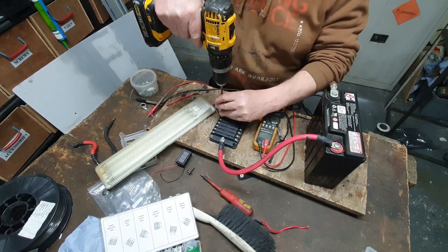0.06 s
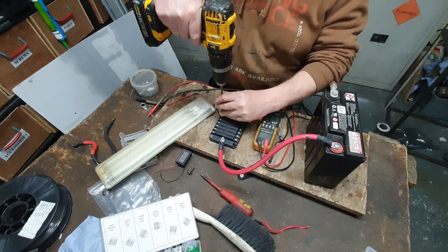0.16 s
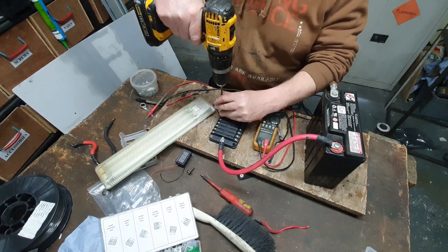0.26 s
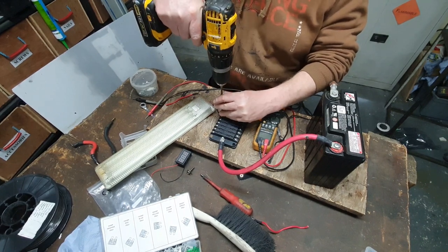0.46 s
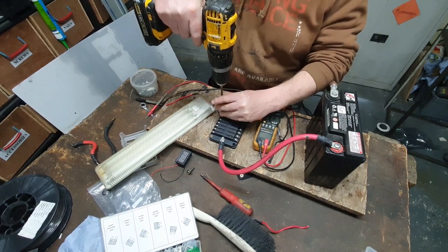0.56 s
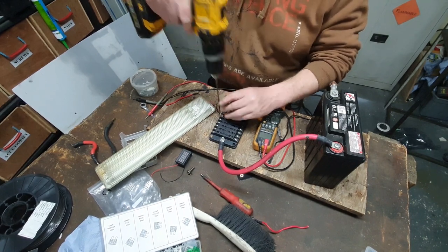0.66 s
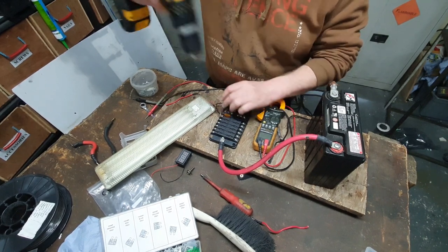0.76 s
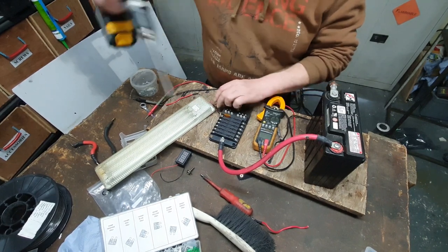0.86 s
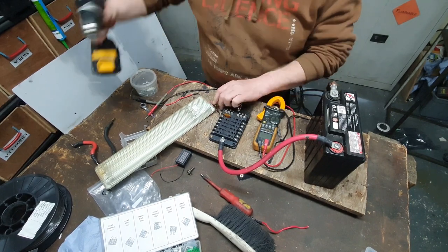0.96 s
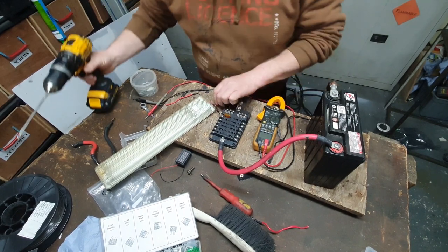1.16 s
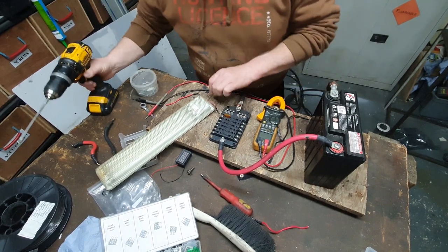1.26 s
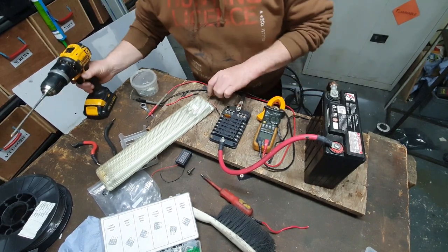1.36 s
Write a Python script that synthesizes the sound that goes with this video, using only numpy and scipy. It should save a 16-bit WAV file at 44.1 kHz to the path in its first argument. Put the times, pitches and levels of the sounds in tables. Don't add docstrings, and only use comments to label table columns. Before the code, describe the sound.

After light contact knocks, a cordless drill whirs up briefly, its bit snaps and slips in the screw, and it stops abruptly; a later clack and quiet metallic rattles follow in a small, lively workshop, heard close.

```python
import sys
import numpy as np
from scipy import signal
from scipy.fft import rfft, irfft, next_fast_len
from scipy.io import wavfile
from scipy.ndimage import uniform_filter1d, map_coordinates

SR = 44100
rng = np.random.default_rng(int(sys.argv[2]) if len(sys.argv) > 2 else 0)


def inscribe(sig):
    pcm = np.round(np.clip(np.atleast_2d(sig).T, -1, 1) * 32767)
    wavfile.write(sys.argv[1], SR, pcm.astype(np.int16))


def boost(x):
    u = np.asarray(x, float) / 20
    return 10 ** u


N = 61739
T = np.arange(N) / SR

# time_s, level_db
WHIR = [
    (0.385, -85),
    (0.391, -52.5),
    (0.429, -25),
    (0.469, -22),
    (0.575, -22),
    (0.591, -29),
    (0.597, -21),
    (0.625, -43.5),
]
# time_s, mesh_hz
MESH = [(0.4, 2600), (0.44, 2760), (0.458, 2960), (0.47, 3020), (0.515, 3170), (0.545, 3200), (0.565, 3370),
        (0.6, 3300), (0.63, 3000)]
# multiple_of_mesh, level_over_whir_db
MESH_ORDERS = [
    (.83, -18.5),
    (.92, -15),
    (1, -5.5),
    (1.09, -18),
    (1.8, -13.5),
    (2, -14),
    (3, -29),
]
# time_s, level_db
LOAD = [
    (0.4, -17.5),
    (0.452, -4.5),
    (0.459, 0.5),
    (0.58, 1),
    (0.61, -7.5),
]
# start_s, end_s
CHOP_SPAN = (.389, .6)
# frequency_hz, density_db_per_hz
GEARBOX = [(88, -36), (150, -4.5), (722, -10), (1600, -2.5), (1730, -3.5), (3100, 1.5), (8010, -7.5),
           (10100, -9), (15500, -13)]
# pitch_hz, width_hz, level_db
HOUSING = [(2480, 75, -5), (3600, 340, -8.5), (5026, 110, -12.5), (5540, 170, -12.5), (8660, 120, -7),
           (9710, 120, 3)]

# start_s, peak_db, pitch_hz, t60_s, broad_noise_db
TAPS = [
    (0.001, -34, 581, 0.09, -12),
    (0.0275, -26, 546, .06, -10.5),
]
# start_s, peak_db, pitch_hz, t60_s, broad_noise_db
KNOCKS = [(0.4305, -11.5, 320, 0.067, -33), (0.2273, -31.5, 2190, 0.037, -7.5),
          (0.2273, -36, 3790, 0.041, -23), (0.236, -41.5, 960, 0.27, -3), (0.394, -33, 1500, 0.042, -15.5),
          (0.408, -21.5, 3160, .03, -22.5), (0.415, -23.5, 2950, .02, -16.5), (0.42, -26, 2600, .03, -22.5),
          (0.428, -21, 540, 0.095, -10), (0.445, -24.5, 780, 0.07, -6.5), (0.5648, -1.5, 1207, 0.018, -19),
          (0.5648, -11.5, 2410, 0.021, -22), (0.5965, -14, 3450, 0.027, -12),
          (0.5953, -15.5, 651, 0.043, -12.5), (0.597, -15.5, 1460, 0.034, -10.5),
          (0.607, -21.5, 1348, 0.021, -27), (0.7647, -45, 1900, 0.013, 5), (0.7657, -26, 1243, 0.044, -6.5),
          (0.766, -20.5, 2380, 0.035, -12.5), (0.766, -34.5, 515, 0.041, -9),
          (0.768, -29, 1545, 0.024, -9.5), (0.775, -39, 900, 0.077, -5), (0.27, -58, 6450, 0.032, 14),
          (0.29, -58, 6000, 0.026, 8), (0.345, -64, 6800, .03, -7), (0.361, -61, 6600, .03, -9)]
# start_s, peak_db, pitch_hz, t60_s, broad_noise_db
TICKS = [(0.898, -59.5, 9500, .015, -2.5), (0.943, -57.5, 554, 0.032, -1.5), (1.0148, -53, 1230, 0.06, -26),
         (1.015, -55, 3400, .06, -13), (1.091, -54.5, 1250, 0.068, -12.5),
         (1.0913, -56.5, 3400, 0.047, -9.5), (1.13, -56.5, 770, 0.08, -3),
         (1.138, -52.5, 1305, 0.084, -10.5), (1.235, -61.5, 4880, 0.055, -1),
         (1.2487, -44.5, 1143, 0.066, -6), (1.2951, -51.5, 1054, 0.17, -5), (1.3395, -53, 2750, .06, -1),
         (1.3405, -50, 4830, 0.048, 3.5), (1.341, -54.5, 8630, 0.14, -10), (1.34, -56, 720, .08, -16),
         (1.349, -46, 750, 0.073, -9), (1.357, -52.5, 3200, 0.046, 0), (1.367, -54, 6600, .04, -11),
         (1.374, -54, 700, 0.047, 2), (1.3885, -42, 4500, 0.092, -17), (1.3905, -38.5, 3220, 0.08, -8.5),
         (1.3905, -44, 4930, .08, -17), (1.391, -45.5, 1780, .07, -14), (1.393, -49, 6880, .05, -25),
         (1.392, -57, 8700, 0.046, -25), (1.394, -36.5, 619, 0.05, -24)]
# pitch_hz, width_hz, level_db
BOARD = [(330, 120, -10), (540, 130, -4), (900, 280, -4.5), (2300, 490, -15)]
# pitch_hz, width_hz, level_db
STEEL = [(750, 125, -7), (2750, 250, 2.5), (3400, 250, 3.5), (4830, 350, 1.5), (6600, 330, -4),
         (8790, 280, -12)]
# frequency_hz, density_db_per_hz
SNAP = [(200, -28), (600, 4.5), (2500, 2), (5000, -6.5), (7000, -10.5), (9000, -13.5), (15500, -27)]
# time_s, pitch_hz, level_db
SWING = [(1.011, 1203, -95), (1.016, 1206, -67.5), (1.07, 1240, -78.5), (1.138, 1326, -65.5),
         (1.2, 1360, -70), (1.299, 1400, -63), (1.4, 1440, -78)]
# start_s, end_s, level_db
SCRAPE = (0.229, 0.295, -64)

# start_s, push_db, ring_time_factor, high_modes_db
PUSHES = [(0.0, -39.5, 0.46, 14), (0.028, -32.5, .9, -0.5), (0.187, -44, 1.4, 0.5), (0.231, -23, 0.95, 1),
          (0.244, -29, 1, -13), (0.304, -49, 0.5, 14), (0.33, -41.5, 0.48, -7), (0.429, -17, .9, -2.5),
          (0.4414, -22.5, 0.3, -16), (0.499, -39, 1.1, -14), (0.549, -40.5, 0.78, 8),
          (0.598, -40.5, 1.1, 10), (0.768, -35, 0.67, 5.5), (0.81, -46, 0.6, 4), (1.337, -44.5, 0.56, -0.5),
          (1.3935, -38, 0.38, 4)]
# pitch_hz, level_db, t60_s
BENCH = [(58.54, -7, 0.36), (77.7, 2.5, 0.092), (147, 0, 0.13), (209.6, -1.5, 0.07), (313, -12.5, 0.095)]

# frequency_hz, t60_s
ROOM = [(100, 0.52), (1000, 0.31), (3000, 0.33), (8000, 0.25), (15000, 0.11)]
# frequency_hz, likeness
ALIKE = [(60, 0.95), (200, 0.93), (500, .75), (1500, 0.38), (3000, 0.29), (5000, -0.025), (12000, 0.25)]
# frequency_hz, likeness
NEAR = [(60, 0.9), (200, .94), (500, 0.85), (1500, 0.62), (4000, .3), (12000, .3)]
# frequency_hz, left_over_right_db
LEAN = [(100, 1), (500, 0.3), (1500, 1.5), (3000, 2.2), (6000, 5), (12000, -0.6)]
# frequency_hz, density_db
AIR = [(18, -44.5), (40, -23), (65, -11.5), (263, -26.5), (520, -17.5), (900, -31.5), (1800, -23),
       (3000, -19), (15500, -49.5)]
# time_s, level_db
AIR_LEVEL = [(0, 3), (0.1, -18), (0.22, -24.5), (0.3, -1.5), (1.2, -8), (1.4, 3)]


def unit(x):
    return x / np.sqrt(np.mean(x ** 2) + 1e-20)


def along(points, hz):
    f, v = np.transpose(points)
    return np.interp(np.log(hz + 1), np.log(f + 1), v)


def curve(rows, outside=None):
    return np.interp(T, *np.transpose(rows), left=outside, right=outside)


def wobble(rate):
    knots = rng.standard_normal(int(N * rate / SR) + 4)
    return map_coordinates(knots, [T * rate])


def filtered(x, response):
    m = next_fast_len(x.shape[-1] + 4096)
    spectrum = rfft(x, m) * response(np.fft.rfftfreq(m, 1 / SR))
    return irfft(spectrum, m)[..., :x.shape[-1]]


def peaks(rows, f):
    return sum((-1) ** k * boost(db) * 1j * f * width / (hz * hz - f * f + 1j * f * width)
               for k, (hz, width, db) in enumerate(rows))


def spread(x, y, alike=ALIKE):
    lag_s = -0.000081

    def turn(f):
        return np.arccos(np.clip(along(alike, f), -1, 1)) / 2

    mid = filtered(x, lambda f: np.cos(turn(f)))
    side = filtered(y, lambda f: np.sin(turn(f)))
    sign = np.array([[1], [-1]])
    return filtered(mid + sign * side,
                    lambda f: boost(sign * along(LEAN, f) / 2) * np.exp(-1j * np.pi * f * lag_s * sign))


def gear_rattle():
    grain_db, housing_db = -1, 2.5
    grains = rng.standard_normal(N) * boost(grain_db * wobble(300) + 1.6 * wobble(60))
    return unit(filtered(
        grains, lambda f: boost(along(GEARBOX, f)) * (1 + boost(housing_db) * abs(peaks(HOUSING, f)))))


def gear_mesh():
    blur_hz, flutter_db = 58.9, 3
    total = np.zeros(N)
    for multiple, db in MESH_ORDERS:
        level = boost(db + curve(LOAD) + flutter_db * wobble(70))
        hz = multiple * curve(MESH) + blur_hz * wobble(150)
        total += level * np.sin(2 * np.pi * np.cumsum(hz) / SR)
    return total


def switching_whine():
    chop_hz, start_db, rise_db = 3930, -45, 4
    on, off = CHOP_SPAN
    level_db = curve([(on, start_db), (on + 0.035, start_db + rise_db), (off, start_db + rise_db)], -140)
    return boost(level_db + 1.7 * wobble(90)) * np.sin(2 * np.pi * chop_hz * T)


def drill():
    return boost(curve(WHIR, -140)) * (gear_rattle() + gear_mesh()) + switching_whine()


def knocks(rows, struck, struck_db, share):
    rise_cycles = 0.54
    ring_life, body_share, body_width = 0.6, 0.15, 0.4
    out, t = np.zeros(N + SR), T[:SR // 5]
    for start_s, db, hz, t60, treble_db in rows:
        a, b, c = rng.standard_normal((3, len(t)))
        body = unit(filtered(a, lambda f: peaks([(hz, body_width * hz, 0)], f) ** 2))
        snap = unit(filtered(b, lambda f: boost(along(SNAP, f))))
        rest = boost(struck_db) * unit(filtered(c, lambda f: peaks(struck, f)))
        swell = 1 - np.exp(-t * hz / rise_cycles)
        ring = np.sin(2 * np.pi * hz * t) * swell * boost(-60 * t / (ring_life * t60))
        noise = boost(-60 * t / t60) * (body_share * body + boost(treble_db) * (rest + snap))
        onset = 1 - np.exp(-t / 0.00027)
        out[round(start_s * SR):][:len(t)] += boost(db) * onset * (share * ring + noise)
    return out[:N]


def contacts(share):
    tap_top_hz, board_db = 4930, 3
    taps = knocks(TAPS, BOARD, board_db, share)
    taps = filtered(taps, lambda f: 1 / (1 + 1j * f / tap_top_hz) ** 3)
    return taps + knocks(KNOCKS, BOARD, board_db, share) + loose_parts(share)


def loose_parts(share):
    return knocks(TICKS, STEEL, 0, share) + loose_part() + scrape()


def loose_part():
    blur_hz, flutter_db, upper, upper_db = 85, 3.5, 2.7, -8
    time_s, pitch_hz, level_db = np.transpose(SWING)

    def tone(multiple):
        level = boost(flutter_db * wobble(110))
        hz = np.interp(T, time_s, pitch_hz) + blur_hz * wobble(250)
        return level * np.sin(2 * np.pi * multiple * np.cumsum(hz) / SR)

    return boost(np.interp(T, time_s, level_db, left=-140)) * (tone(0.99) + boost(upper_db) * tone(upper))


def scrape():
    grain_db = 4.5
    on, off, db = SCRAPE
    grains = rng.standard_normal(N) * boost(grain_db * wobble(400))
    grains = filtered(grains, lambda f: peaks([(6000, 7000, 0)], f) ** 2)
    level_db = curve([(on, db), (off, db - 1), (off + .012, db - 10), (off + .07, db - 9)], -140)
    return boost(level_db) * unit(grains)


def bench():
    out, t = np.zeros(N + SR), T[:SR // 2]
    onset = 1 - np.exp(-t / 0.0055)
    for start_s, db, lasts, high_db in PUSHES:
        for hz, level_db, t60 in BENCH:
            gain = boost(db + level_db + high_db * (hz > 100) - 60 * t / (lasts * t60))
            out[round(start_s * SR):][:len(t)] += gain * np.sin(2 * np.pi * hz * t) * onset
    return out[:N]


def expanded(x):
    threshold_db, slope, window_s = -52.5, 1, 0.042
    power = uniform_filter1d(np.mean(x ** 2, axis=0), round(window_s * SR))
    level_db = 10 * np.log10(abs(power) + 1e-12)
    return x * boost(slope * np.minimum(level_db - threshold_db, 0))


def room(x):
    renewal_s, delay = 0.18, 250
    wet, step = np.zeros((2, N + SR)), round(renewal_s * SR)
    for start in range(0, N, step):
        hz, t, z = signal.stft(rng.standard_normal((2, SR // 2)), SR, nperseg=256)
        decay = boost(-60 * t / along(ROOM, hz)[:, None])
        tail = signal.istft(z * decay, SR, nperseg=256)[1]
        tail = tail / np.linalg.norm(tail[0])
        part = signal.fftconvolve(x[None, start:start + step], tail, axes=1)
        wet[:, start + delay:start + delay + part.shape[1]] += part
    return spread(*wet[:, :N])


def air():
    air_db, sway_db = -64, 1.2
    a, b = filtered(rng.standard_normal((2, N)), lambda f: boost(along(AIR, f)))
    return boost(air_db + curve(AIR_LEVEL) + sway_db * wobble(17)) * spread(unit(a), unit(b))


def scene():
    room_db, knock_room_db, thump_room_db = -10, -11, -9
    whir, hits = drill(), contacts(0.8)
    whir_side, hits_side = drill(), contacts(0)
    thump = bench()
    direct = spread(whir, whir_side) + spread(hits, hits_side, NEAR)
    thumps = expanded(thump + boost(thump_room_db) * room(thump))
    walls = room(boost(room_db) * whir + boost(knock_room_db) * hits)
    return direct + thumps + walls + air()


def roll_off(x):
    return signal.sosfilt(signal.butter(12, 15710, fs=SR, output="sos"), x)


def record(dry):
    top_hz, edge_hz = 15600, 800
    mix = filtered(dry, lambda f: np.sin(np.pi / 2 * np.clip((top_hz - f) / edge_hz, 0, 1)) ** 2)
    return roll_off(mix)


dry = scene()
out = record(dry)
inscribe(out)
```